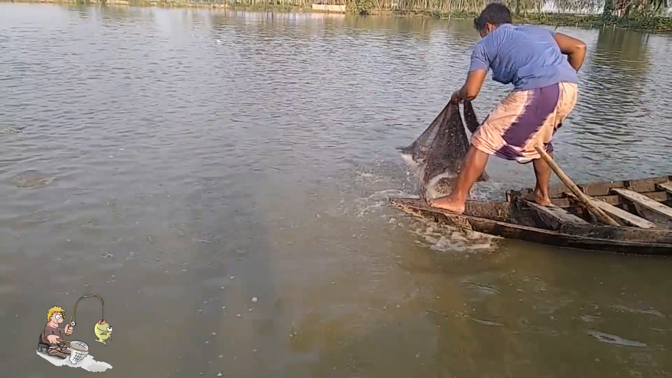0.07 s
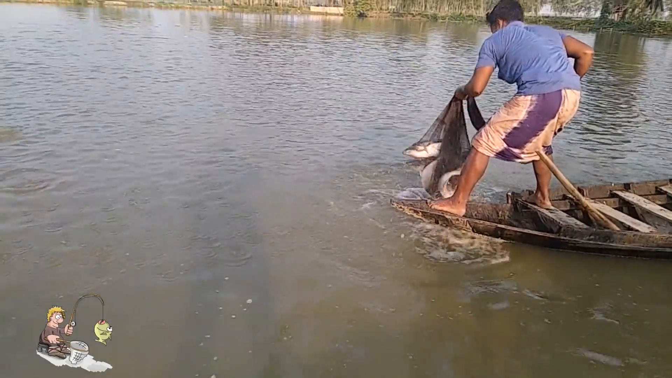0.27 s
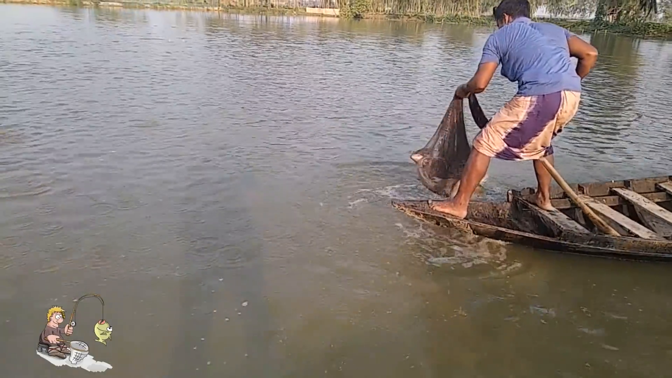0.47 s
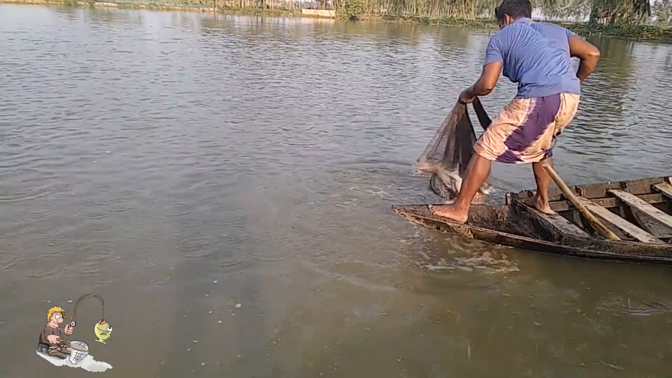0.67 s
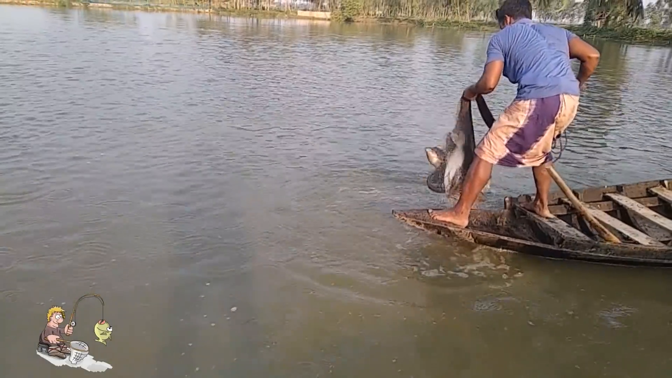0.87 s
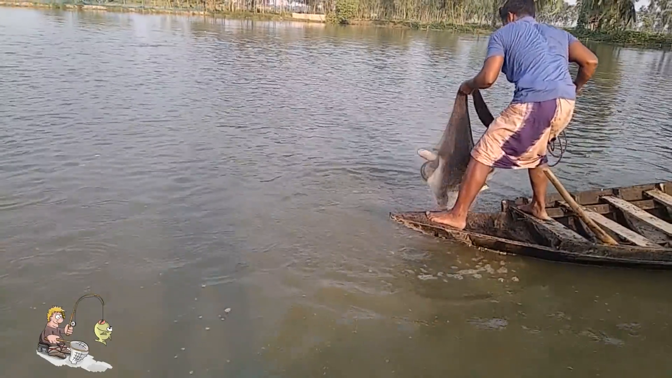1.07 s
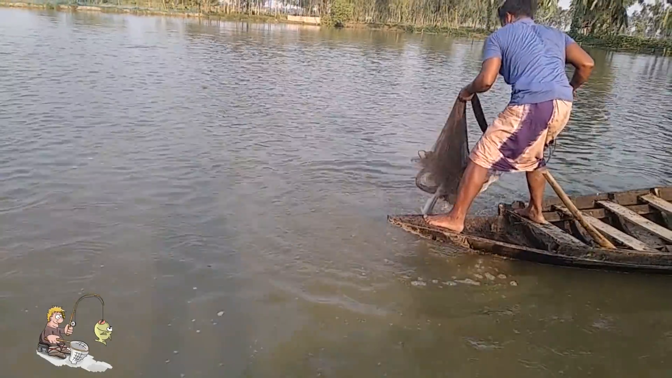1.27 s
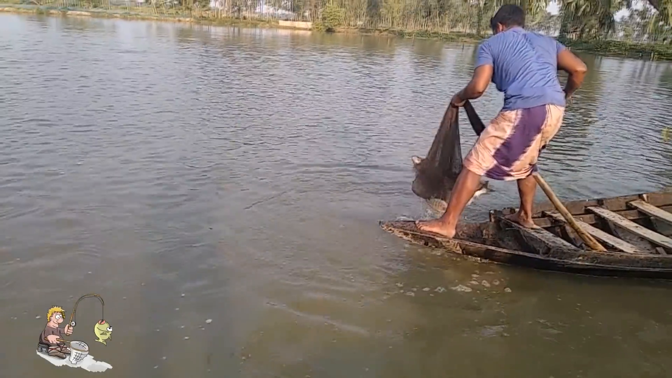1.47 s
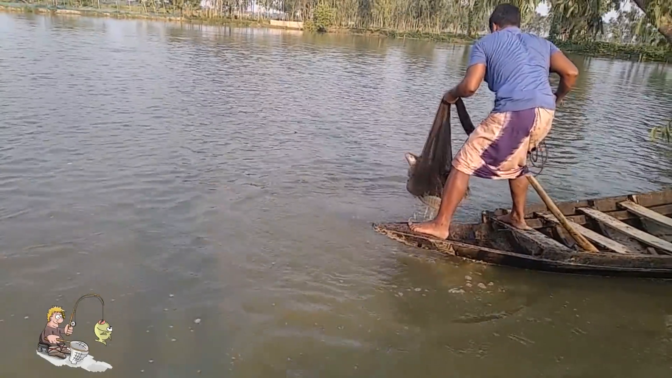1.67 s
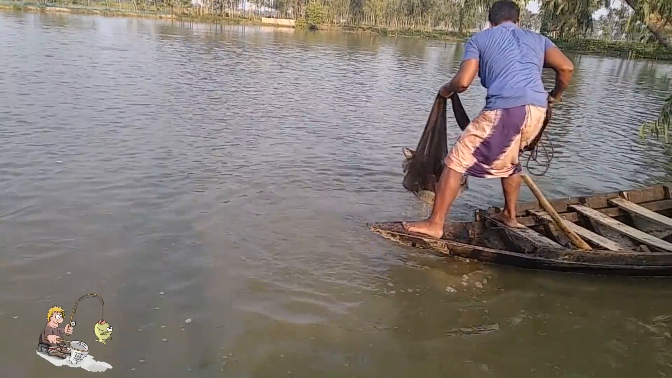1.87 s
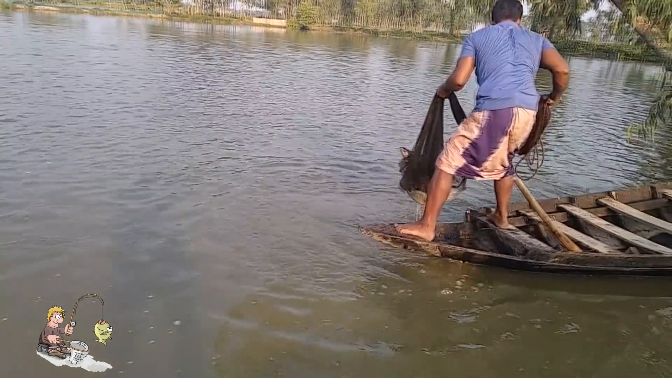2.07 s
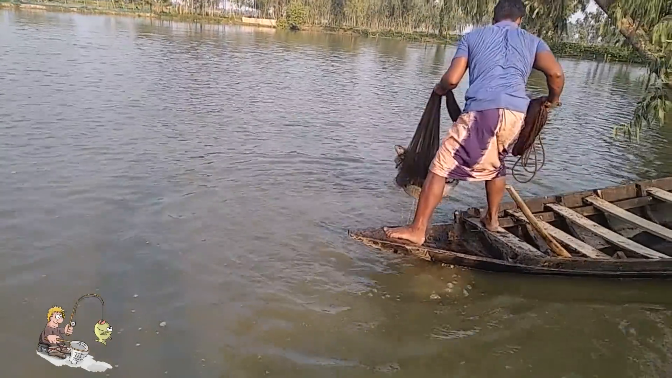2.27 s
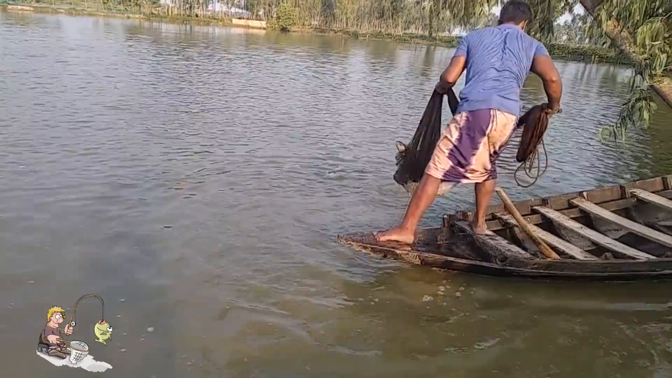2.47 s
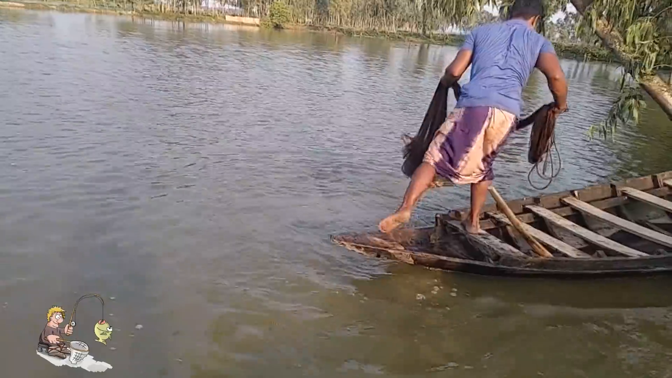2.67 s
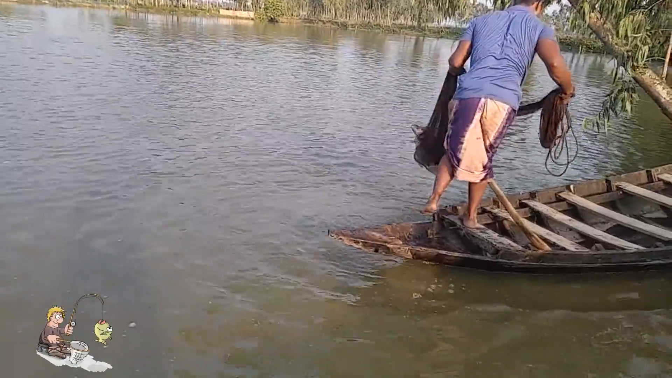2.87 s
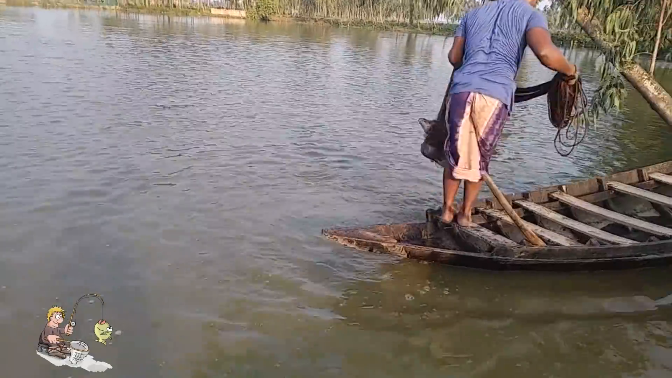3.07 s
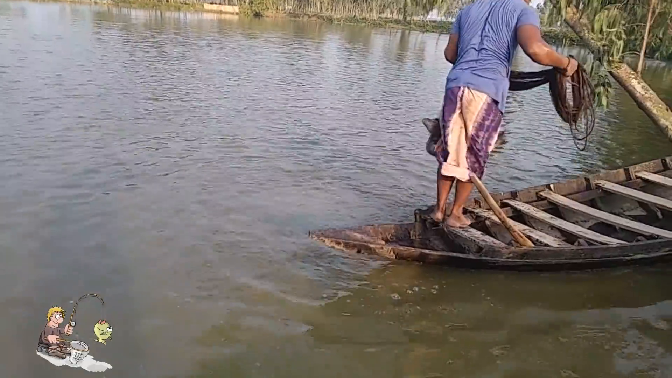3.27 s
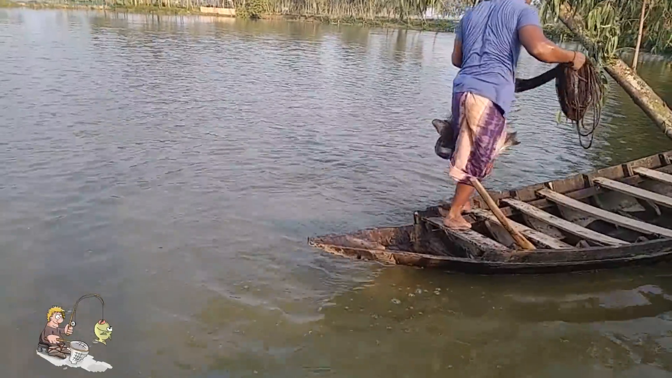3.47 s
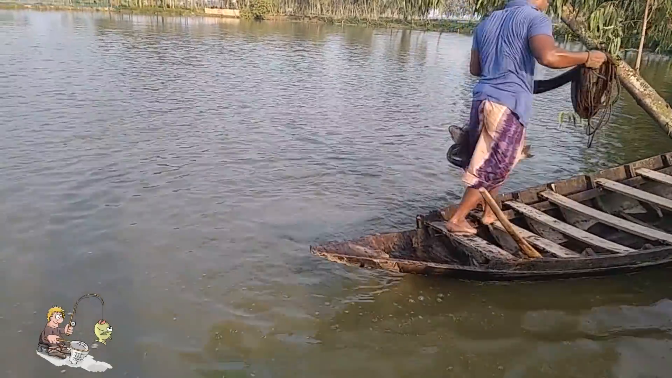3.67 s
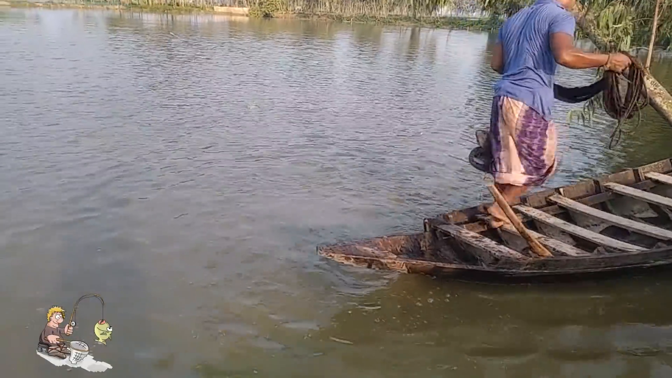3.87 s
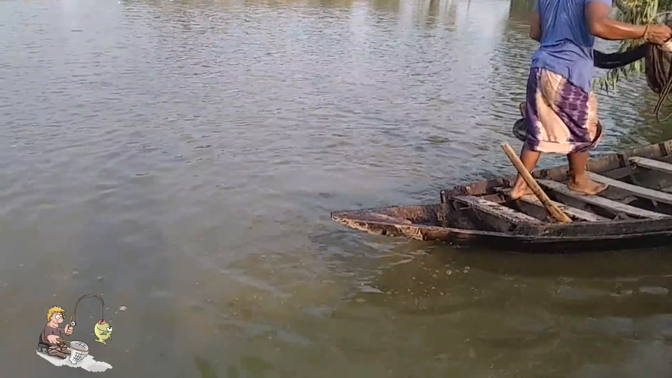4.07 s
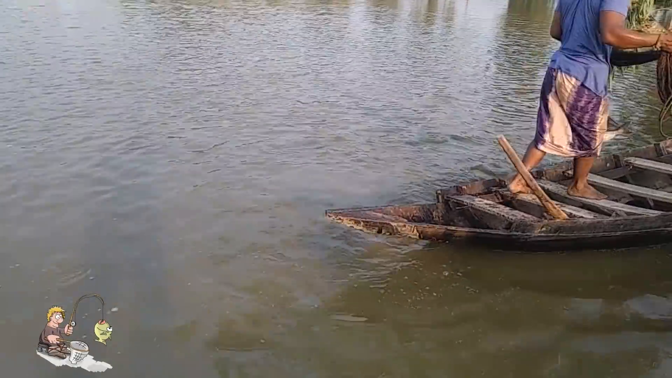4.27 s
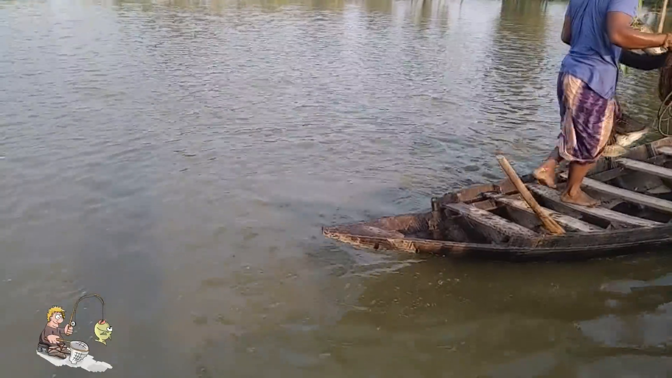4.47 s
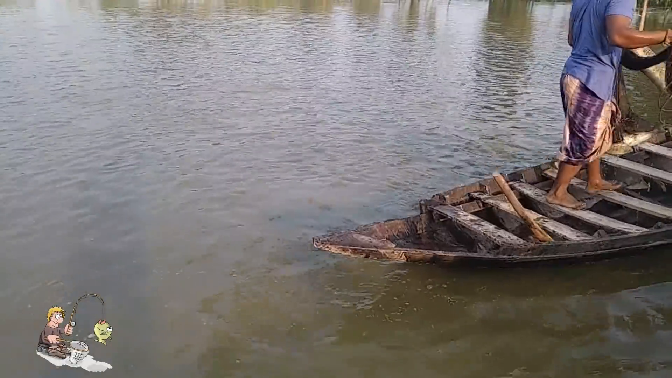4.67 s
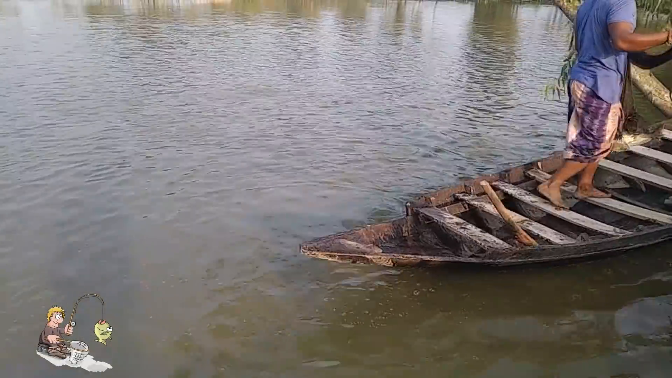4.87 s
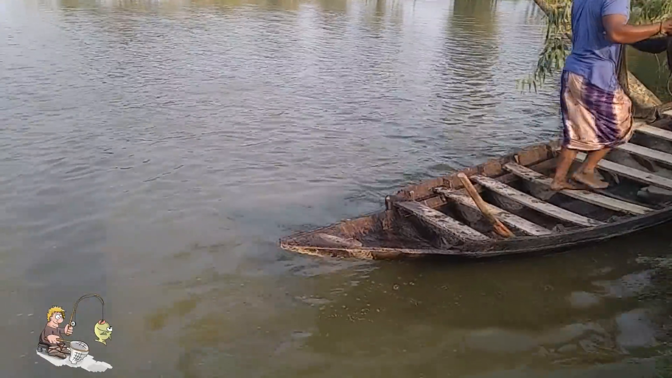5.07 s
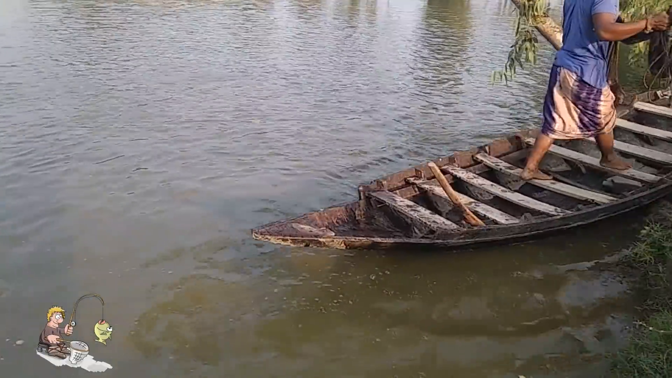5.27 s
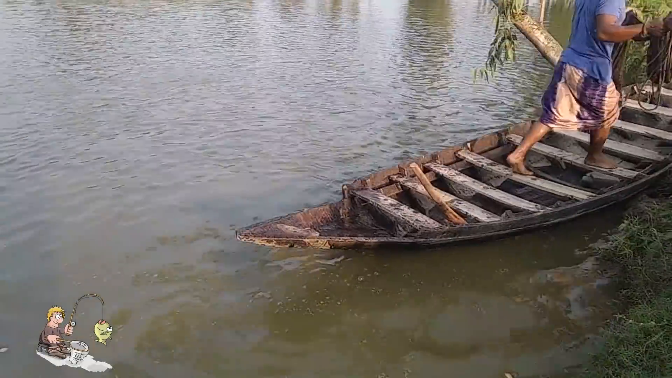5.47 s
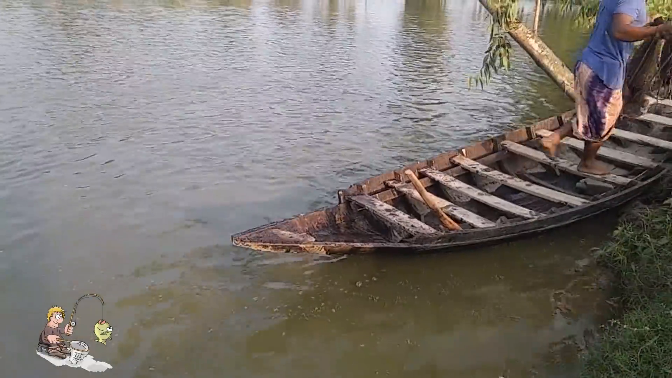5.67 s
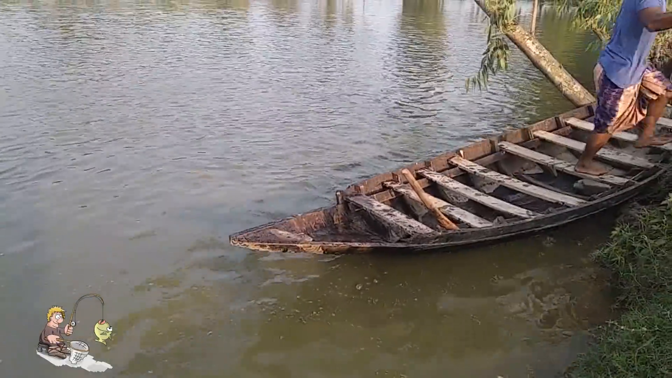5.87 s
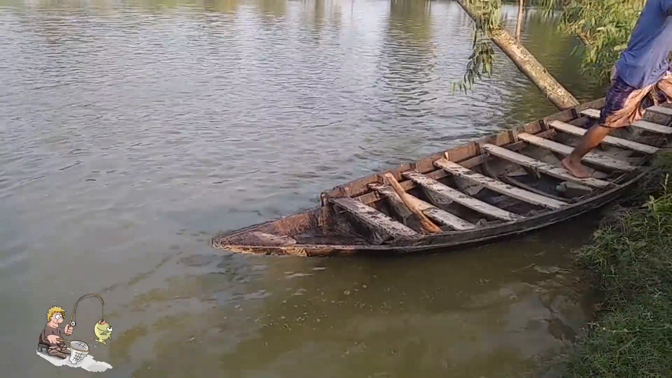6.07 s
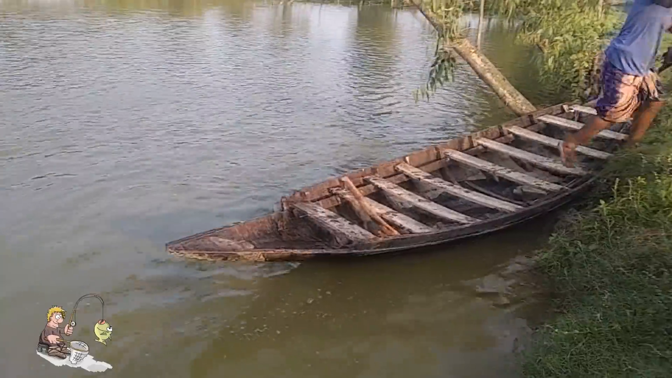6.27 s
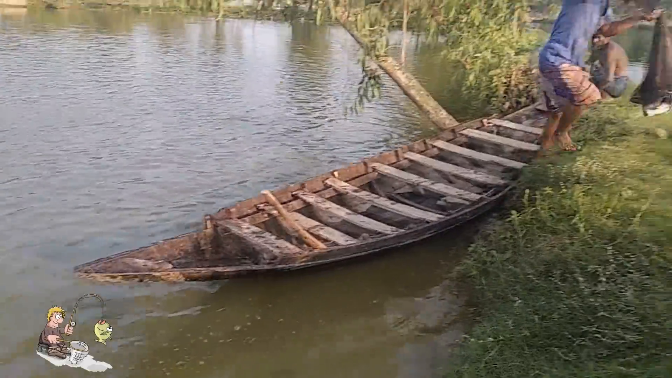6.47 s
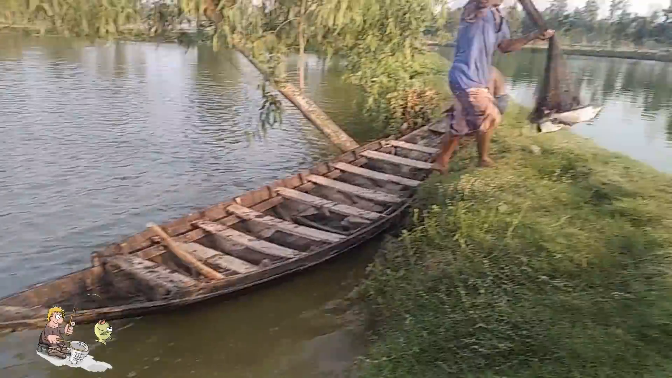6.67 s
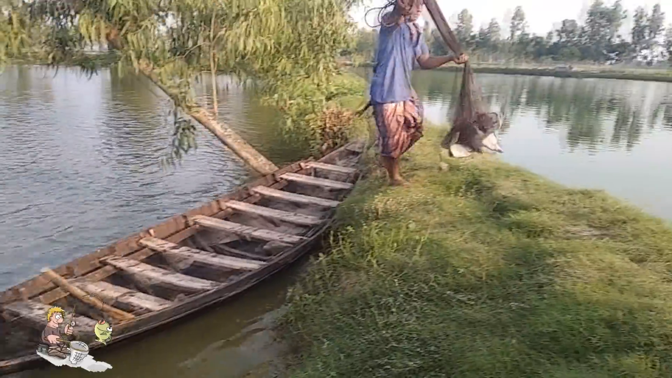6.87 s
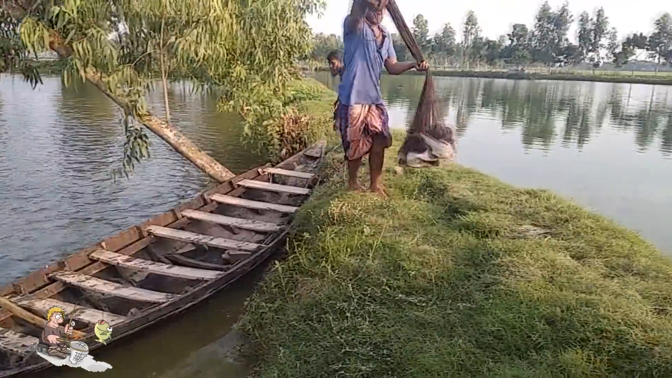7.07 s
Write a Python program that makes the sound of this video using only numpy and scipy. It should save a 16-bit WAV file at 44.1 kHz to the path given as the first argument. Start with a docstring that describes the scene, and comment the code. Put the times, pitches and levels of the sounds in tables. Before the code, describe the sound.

Close outdoor stereo on quiet water: a wet net is heaved up with pouring, splashing and plopping bubbles, strongest in the first second or so, with low knocks on the hull. Drips and soft mesh rustle follow, then dull barefoot thuds on planks, a sharp wooden crack, a brief wet squeak, deep plops, and finally a short groan and bright clicking of net weights.

```python
"""On a river, from a wooden boat: a cast net is hauled aboard, water pouring and splashing off its mesh (noise
and dense clicks) while pockets of air plop (rising tones) and the first footfalls knock (hull modes).
The drained net then rustles and drips as bare feet knock the planks and ripples meet the rocking hull.
A crack on the wood (shaped snaps) and a wet foot's squeak (a gliding tone with overtones) follow; last, the hull
groans and the net is swung to the grassy bank, its sinkers clicking. Two microphones hear it in open air."""
import sys
import numpy as np
from scipy import signal
from scipy.fft import rfft, irfft
from scipy.io import wavfile
from scipy.ndimage import uniform_filter1d

SR = 44100
rng = np.random.default_rng(int(sys.argv[2]) if len(sys.argv) > 2 else 0)


def inscribe(sig):
    """Save sig as 16-bit PCM at rate SR to the path in sys.argv[1].

    A 1-D sig is mono; a 2-D sig holds one channel per row.
    Samples are clipped to [-1, 1] before scaling.
    """
    pcm = np.round(np.clip(np.atleast_2d(sig).T, -1, 1) * 32767)
    wavfile.write(sys.argv[1], SR, pcm.astype(np.int16))


N = 314433
TIME = np.arange(N) / SR  # seconds

# Likeness of the two microphones. Each row: frequency in Hz, correlation from 0 to 1.
LIKENESS = [(300, 0.92), (700, 0.4), (2500, 0.3), (5000, 0)]
# Tilt between the microphones. Each row: frequency in Hz, left minus right in dB.
BALANCE = [(500, 0.5), (1200, 0.5), (2400, 7), (4400, -1.5), (13000, -0.5)]
EDGE_HZ = 16200  # upper band limit

# Spectra, before each sound is brought to its level. Each row: frequency in Hz, relative density in dB per Hz.
AIR_COLOUR = [(30, -23.5), (70, 2.5), (800, -10.5), (2400, -52), (4200, -29), (12500, -24), (14500, -42)]  # open air
ROCK_COLOUR = [(25, -46), (55, 9.5), (95, 8), (170, -13.5), (300, -15), (700, -44.5)]  # rumble of the hull
SQUIRT_COLOUR = [(300, -16), (800, 8), (1700, -2), (3300, 7), (4500, 2.5), (6300, 13.5), (9000, -32)]  # water squirting from under the foot
CHURN_COLOUR = [(100, -35), (250, -3), (500, 6), (1500, 3), (2600, 6.5), (4200, -6), (8000, -4.5),
                (15000, -45.5)]  # stirred water
CRACK_COLOUR = [(150, -13), (700, -1.5), (1400, -7), (2600, -7), (4200, -8), (6700, -3), (9500, -4),
                (16000, -13)]  # hard contact on wood
SPRAY_COLOUR = [(1200, -13), (3000, -7), (4400, -8.5), (6500, 1), (9500, 1), (13000, -0.5), (16000, -13)]  # water off the lifted net
MESH_COLOUR = [(2800, -18.5), (4400, -8), (6800, 5), (9000, 1.5), (12500, -9.5), (14500, -27)]  # drained mesh, gently moved
PULL_COLOUR = [(2000, -30.5), (4800, -34), (7000, -8), (10000, -3), (13000, -7), (16000, -17.5)]  # drained mesh, hard pulled; also the sinkers

# Shifts of weight that rock the hull. Each row: peak in seconds, level in dB.
HEAVES = [(1.0, -43.5), (3.143, -40.5), (3.55, -46.5), (3.863, -39), (4.03, -41), (4.289, -41),
          (4.69, -41.5), (4.87, -45), (5.11, -36.5), (5.54, -44), (5.93, -42.5), (6.37, -38.5),
          (6.762, -46)]
HEAVE_RISE_S, HEAVE_FALL_S, ADRIFT_DB = 0.085, 0.13, -68  # from and to a tenth; level between heaves

# Modes of the hull. Each row: centre frequency in Hz, relative level in dB, decay by 60 dB in seconds.
HULL = [(77, -16, 0.02), (98, -5, 0.049), (149, -14, 0.35), (216, -4, 0.1), (330, 6.5, 0.043),
        (423, -7, 0.17), (546, 2, 0.05), (845, -3.5, 0.047), (1370, 4, 0.0092)]
# Feet and the loaded net on the planks. Each row: start in seconds, peak in dB, hardness as a cutoff in Hz.
STEPS = [(0.979, -26, 500), (1.018, -25.5, 400), (1.063, -35, 300), (3.13, -35.5, 220), (3.167, -40, 400),
         (3.216, -28, 544), (3.236, -35.5, 420), (3.869, -46, 160), (4.04, -23.5, 345), (4.05, -20, 1090),
         (4.097, -35, 200), (4.3, -32, 234), (4.35, -30, 100), (5.053, -23, 296), (5.121, -50, 90),
         (6.298, -36.5, 214), (6.368, -36, 100)]

# Boat groaning against the bank. Each row: time in seconds, level in dB, pitch in Hz, overtone share in dB.
GROAN = [(6.39, -68, 347, 12), (6.425, -56.5, 307, 16), (6.475, -56.5, 285, 18), (6.525, -43, 365, -16)]
# Wet foot on wood. Each row: time in seconds, level in dB, pitch in Hz, overtone share in dB.
SQUEAK = [(5.533, -62, 340.5, 6), (5.545, -48.5, 342.7, 1), (5.565, -38.5, 379, -3),
          (5.577, -26, 389, -21.5), (5.596, -37, 412.5, -25), (5.62, -47, 425, -11)]

# Water stirred by net or hull. Each row: peak in seconds, level in dB before churn's gain, rise in seconds.
SLOSHES = [(0.02, -25.5, 0.061), (0.12, -31.5, 0.15), (0.38, -44, 0.03), (0.6, -46.5, 0.28),
           (0.89, -37, 0.046), (0.99, -35.5, 0.031), (1.11, -44.5, 0.42), (1.455, -43, 0.13),
           (1.755, -47.5, 0.04), (1.885, -52.5, 0.014), (2.15, -43, 0.08), (2.45, -41.5, 0.23),
           (3.0, -53.5, 0.4), (3.48, -41.5, 0.0052), (3.95, -48, 0.06), (4.39, -41, 0.01),
           (4.83, -44.5, 0.02), (5.07, -40.5, 0.011), (5.44, -42, 0.034), (5.58, -42, .04),
           (6.225, -44.5, 0.042), (6.53, -46, 0.21)]
SLOSH_FALL_S, SLOSH_FALL_SHARE = 0.076, 1  # fall to a tenth: a base plus a share of the rise
LAPPING_DB = -59  # before churn's gain: the water never rests against the hull
# Larger pockets held under net or hull. Each row: start and length in seconds, level in dB, mean pitch in Hz.
GURGLES = [(0.247, 0.2, -52.5, 606), (0.533, 0.12, -49, 368), (1.205, 0.1, -52, 509),
           (2.43, 0.097, -42, 554), (2.615, 0.044, -41.5, 821), (3.891, 0.123, -45.5, 367)]
# Air pockets closing. Each row: closing time in seconds, level in dB before the plops' gain, pitch in Hz.
PLOPS = [(0.002, -24, 543), (0.11, -20.5, 632), (0.303, -33.5, 1800), (0.889, -30.5, 890), (1.02, -28, 810),
         (1.023, -27.5, 1500), (1.063, -16.5, 970), (1.064, -21, 1766), (1.1, -30.5, 1260),
         (1.215, -27, 1830), (1.447, -24.5, 1620), (1.542, -30, 1450), (1.57, -33, 1500),
         (1.712, -34.5, 1830), (1.757, -43.5, 852), (1.882, -32.5, 1063), (1.96, -42, 1674),
         (2.084, -33, 1173), (2.183, -40.5, 1440), (2.328, -30.5, 980), (2.409, -30.5, 666),
         (2.412, -31.5, 1620), (2.439, -33.5, 540), (2.469, -34.5, 432), (2.509, -22.5, 987),
         (2.63, -30, 656), (2.661, -34.5, 712), (2.997, -38, 943), (3.005, -41.5, 1674), (3.685, -44, 680),
         (3.815, -40.5, 1925), (3.872, -43, 1100), (3.882, -39.5, 486), (3.931, -18.5, 1040),
         (3.965, -34, 635), (3.987, -39.5, 794), (4.265, -50.5, 1415), (4.354, -40, 2120),
         (4.555, -40.5, 1210), (4.652, -36.5, 1075), (5.429, -31.5, 1620), (5.44, -22, 604),
         (5.48, -38, 367), (5.698, -45, 1006), (5.983, -20, 341), (5.995, -15, 441), (6.008, -28, 598),
         (6.061, -38.5, 1260), (6.209, -29, 1960), (6.629, -36.5, 1326), (6.666, -37, 1070)]
# A pocket at RING_AT_DB has a decay of RING_CYCLES; louder ones decay sooner, softer ones ring on.
RING_CYCLES, RING_AT_DB, RING_DAMPING = 4.0, -31.5, 0.54
# Drops falling back on the water; the last three rows are the mid-pitched crackle of the net as it is swung.
# Each row: start in seconds, level in dB, centre in Hz.
SPATTERS = [(0.84, -35, 2530), (0.915, -40, 2200), (0.979, -40, 704), (1.085, -35, 1950),
            (1.145, -35.5, 2170), (1.44, -33.5, 1680), (2.237, -46.5, 2720), (2.407, -36, 1890),
            (2.503, -36, 2350), (2.544, -39.5, 2410), (6.861, -49.5, 2530), (6.946, -39.5, 2600),
            (7.01, -43, 2630)]
# Slaps of water and ticks of the net. Each row: start in seconds, level in dB before the slaps' gain, centre in Hz.
SLAPS = [(0.025, -13, 10000), (0.108, -14, 7150), (0.1072, -19.5, 990), (0.1423, -11.5, 2500),
         (0.233, -12, 10700), (0.5282, -23, 13300), (0.608, -20.5, 9100), (0.6802, -14.5, 11200),
         (0.7215, -25, 12100), (0.755, -16.5, 8800), (0.77, -13, 12000), (0.832, -15.5, 9800),
         (0.8927, -18.5, 2800), (1.0177, -17.5, 1460), (2.162, -38, 6060), (2.289, -39.5, 2360),
         (2.345, -32.5, 2780), (2.3597, -33, 6700), (2.446, -29.5, 6700), (2.603, -36.5, 5900),
         (3.047, -43, 4500), (4.218, -38, 2380), (4.3805, -34, 2350), (5.438, -30, 2750),
         (5.455, -27.5, 8200), (6.218, -20.5, 2570), (6.224, -14.5, 3200), (6.2758, -25.5, 4530),
         (6.2967, -27.5, 5430), (6.838, -30.5, 2320), (7.003, -17, 10400)]

# Crack with rebounds and echoes. Each row: time in seconds, level in dB relative to the crack's gain.
CRACK = [(5.052, 13), (5.057, -8), (5.073, -13), (5.0816, -8)]
# Sinkers clicking together. Each row: time in seconds, level in dB relative to the sinkers' gain.
SINKERS = [(0.6807, 7), (0.6862, 6.5), (0.7225, 8), (0.849, 1.5), (5.391, -7.5), (5.848, 0), (6.263, -7),
           (6.8275, 5), (6.875, 12.5), (6.882, 7), (6.964, 4), (6.969, 11), (6.997, 14.5)]

# Net heaves and catch thrashes, throwing spray. Each row: peak in seconds, level in dB, rise in seconds.
SPLASHES = [(0.03, -24, 0.84), (0.17, -25.5, 0.34), (0.62, -40.5, 0.074), (0.78, -28, 0.16),
            (0.85, -23.5, 0.038), (0.99, -23.5, 0.012), (1.1, -24.5, 0.03), (1.32, -37.5, 0.0087),
            (1.45, -40, 0.0099)]
SPLASH_FALL_S, SPLASH_FALL_SHARE = 0.094, 0.24  # fall to a tenth: a base plus a share of the rise
# Water running off the lifted net. Each row: time in seconds, level in dB.
RUNOFF = [(0.0, -41), (0.46, -52.5), (1.2, -42), (1.65, -60), (3.3, -89)]
# Drained mesh gathered, shifted, swung. Each row: start in seconds, level in dB, length in seconds.
RUSTLES = [(2.036, -47.5, 0.2), (2.359, -47.5, 0.057), (2.417, -50, 0.16), (2.592, -56, 0.078),
           (2.81, -52.5, 0.082), (2.94, -56, 0.16), (3.839, -52.5, 0.14), (4.412, -40.5, 0.016),
           (4.586, -50.5, 0.033), (4.861, -43, 0.06), (5.04, -32, 0.026), (5.365, -45.5, 0.084),
           (5.527, -32.5, 0.041), (5.814, -35, 0.077), (5.883, -55, 0.11), (6.083, -48.5, 0.052),
           (6.21, -44, 0.081), (6.34, -54, 0.35), (6.762, -36, 0.14), (6.865, -30, 0.16),
           (6.935, -23, 0.066), (7.099, -32, 0.023)]
CATCH_S, CATCH_SHARE, RUSTLE_FALL_S = 0.0038, 0.31, 0.098  # catch: base plus share of length; fall to a tenth


def amp(db):
    """Decibels to gain."""
    return 10 ** (np.asarray(db) / 20)


def unit(x):
    """Scales to rms 1."""
    return x / np.sqrt(np.mean(x ** 2) + 1e-20)


def read(points, hz):
    """Reads a spectrum table on a log-frequency axis."""
    f, value = np.transpose(points)
    return np.interp(np.log(hz + 1), np.log(f), value)


def level(curve):
    """A dB curve as a gain for every sample."""
    return amp(np.interp(TIME, *np.transpose(curve)))


def add(mix, s, sound):
    """Mixes a sound in at time s, trimming what falls outside."""
    start = round(s * SR)
    sound = sound[..., max(-start, 0):]
    part = mix[:, max(start, 0):][:, :sound.shape[-1]]
    part += sound[..., :part.shape[1]]


def colour(x, points):
    """Gives two unrelated signals a spectrum, and makes the microphones alike in the bass."""
    hz = np.fft.rfftfreq(x.shape[1], 1 / SR)
    a, b = rfft(x)
    angle = np.arccos(np.clip(read(LIKENESS, hz), -1, 1)) / 2
    pair = a * np.cos(angle) + np.array([b, -b]) * np.sin(angle)
    return unit(irfft(pair * amp(read(points, hz)), x.shape[1]))


def wobble(size):
    """Smooth random curve of rms 1, changing over the given number of samples."""
    once = uniform_filter1d(rng.standard_normal(N), size)
    return unit(uniform_filter1d(once, size))


def patchy(x, depth_db, size):
    """Random patches in pitch and time (size in bins, frames), as clusters of drops come and go."""
    z = signal.stft(x, nperseg=512, noverlap=384)[2]
    field = rng.standard_normal(z.shape[1:])
    for axis in (0, 1, 0, 1):
        field = uniform_filter1d(field, size[axis], axis)
    patched = z * amp(depth_db * unit(field))
    return signal.istft(patched, nperseg=512, noverlap=384)[1][:, :N]


def grains(per_s, spread_db):
    """Tiny clicks of uneven size, each reaching the two microphones with its own lag."""
    size = amp(spread_db * np.minimum(rng.exponential(1, N), 4)) * rng.choice([-1, 1], N)
    lag = rng.integers(-18, 19, N)  # samples
    at = np.flatnonzero(rng.random(N) < per_s / SR)
    left = np.bincount(at, size[at], N)
    right = np.bincount((at + lag[at]) % N, size[at], N)
    return unit(np.array([left, right]))


def swells(rows, fall_s, fall_share):
    """Each gesture swells from a tenth in its rise time and dies away; slow ones can also fade slowly."""
    power = np.zeros(N)
    for s, db, rise_s in rows:
        rising = (s - TIME) / rise_s
        falling = (TIME - s) / (fall_s + fall_share * rise_s)
        tenths = np.maximum(rising, falling)  # powers of ten below the peak
        near = tenths < 3
        power[near] += (amp(db) * 10 ** -tenths[near]) ** 2
    return np.sqrt(power)


def open_air(air_db=-59.5):
    """Steady coloured noise: the quiet open air."""
    return amp(air_db) * colour(rng.standard_normal((2, N)), AIR_COLOUR)


def surroundings(x, wet_db=-15, t60=0.21):
    """A short faint scatter off the boat and the bank: decaying noise that starts 4 ms late."""
    t = np.arange(SR // 3) / SR
    tail = rng.standard_normal((2, len(t))) * np.exp(-np.log(1000) * t / t60) * (t > .004)
    tail = colour(tail, [(3000, 0), (12000, -8)]) / np.sqrt(len(t))
    return x + amp(wet_db) * signal.oaconvolve(x, tail, axes=1)[:, :N]


def rocking():
    """The hull rumbles around every shift of weight, and faintly while it drifts."""
    heaves = [(s, db, HEAVE_RISE_S) for s, db in HEAVES]
    heaving = swells(heaves, HEAVE_FALL_S, 0)
    return np.hypot(heaving, amp(ADRIFT_DB)) * colour(rng.standard_normal((2, N)), ROCK_COLOUR)


def churn(gain_db=-4, wash_db=-5, per_s=16, busy_db=-48, cycles=3.94, rise=0.064, count=24):
    """Small rising bubbles in a wash of moving water: a few when calm, a crowd when stirred."""
    stir = np.hypot(swells(SLOSHES, SLOSH_FALL_S, SLOSH_FALL_SHARE), amp(LAPPING_DB))
    crowd = np.clip(stir / amp(busy_db), .5, 20)  # stirred water traps more air
    bubbles = np.zeros((2, N))
    for hz in np.geomspace(300, 3500, count):
        age = np.arange(int(4 * cycles / hz * SR)) * hz / SR / cycles
        turns = cycles * (age + rise * age ** 2 / 2)
        bubble = age * np.exp(-2 * age) * np.sin(2 * np.pi * turns)
        births = grains(per_s * crowd, spread_db=4.5) / np.sqrt(crowd)
        bubbles += signal.oaconvolve(births, unit(bubble)[None] * np.sqrt(hz), axes=1)[:, :N]
    wash = patchy(rng.standard_normal((2, N)), depth_db=4.5, size=(5, 5))
    bubbly = crowd / (crowd + 2)  # calm water is mostly a soft wash
    water = bubbly * colour(bubbles, CHURN_COLOUR) + amp(wash_db) * colour(wash, CHURN_COLOUR)
    return amp(gain_db) * stir * unit(water)


def gurgles(waver=0.069, flutter_db=4.5, rise=0.092):
    """A held pocket of air rings with an unsteady pitch and strength, rising a little."""
    out = np.zeros((2, N))
    drift, flutter = waver * wobble(size=300), flutter_db * wobble(size=400)
    for s, length, db, hz in GURGLES:
        now = (TIME >= s) & (TIME < s + length)
        age = (TIME[now] - s) / length
        turns = np.cumsum(hz * (1 + drift[now] + rise * (age - .5))) / SR
        swell = np.sqrt(2 * np.sin(np.pi * age))
        add(out, s, amp(db + flutter[now]) * swell * np.sin(2 * np.pi * turns))
    return out


def plops(gain_db=-1, froth_db=-4.5, froth_width=0.4, slosh_db=-12, slosh_s=0.014,
          rise=0.1227, bend=0.4, lag_s=0.00026):
    """Each air pocket swells and rings, rising in pitch; a slower slosh of froth surrounds it."""
    out, t = np.zeros((2, N)), np.arange(-2000, 3000) / SR
    for s, db, hz in PLOPS:
        decay = RING_CYCLES / hz * amp(RING_AT_DB - db) ** RING_DAMPING
        swell = 1 / (np.exp(-2 * t / decay) + np.exp(t / decay))
        swell /= swell.max()
        slosh = amp(slosh_db) * np.exp(-np.maximum(t, -2 * t) / slosh_s)
        octaves = np.clip(rise * t / decay, -bend, bend)
        turns = np.cumsum(hz * 2 ** octaves) / SR
        turns = turns - turns[swell.argmax()]  # the ring is tied to the moment the pocket closes
        turns = turns + hz * lag_s * rng.standard_normal() * np.array([[.5], [-.5]])  # direction of arrival
        pole = np.exp(-np.pi * froth_width * hz / SR)
        lowpass = [[1, 0, 0, 1, -2 * pole, pole ** 2]]
        froth = unit(signal.sosfilt(lowpass, rng.standard_normal(len(t))))
        ring = swell * np.sin(2 * np.pi * turns)
        frothing = (amp(froth_db) * swell + slosh) * froth * np.cos(2 * np.pi * turns)
        add(out, s + t[0], amp(db + gain_db) * (ring + frothing))
    return out


def spatter(peak_s=0.0091, skirt_db=-11, far_db=-30):
    """A quick shower of separate clicks, falling drops or the crackling net, dulled around a centre pitch."""
    out, age = np.zeros((2, N)), np.arange(4096) / SR / peak_s
    drops = grains(per_s=1600, spread_db=4.0)
    for s, db, hz in SPATTERS:
        shower = drops[:, round(s * SR):][:, :len(age)]
        shower = colour(shower, [(hz / 10, far_db), (hz / 2, skirt_db / 2), (hz, 0),
                                 (hz * 2, skirt_db * 2), (hz * 10, 2 * far_db)])
        add(out, s, amp(db) * age * np.exp(1 - age) * shower)
    return out


def slaps(gain_db=-6, skirt_db=-11, low_db=-24, high_db=-26, peak_s=0.0022, spiky=0.5, pan_db=-1.5):
    """Tight clusters of tiny impacts, each cluster with its own centre pitch and side."""
    out, age = np.zeros((2, N)), np.arange(1024) / SR / peak_s
    shape = age * np.exp(1 - age)
    for s, db, hz in SLAPS:
        spikes = np.exp(spiky * np.minimum(rng.standard_normal(len(age)), 2))
        impacts = rng.standard_normal((2, len(age))) * spikes
        burst = colour(impacts, [(hz / 8, low_db), (hz / 2, skirt_db), (hz, 0),
                                 (hz * 2, skirt_db), (hz * 5, high_db)])
        side = pan_db * rng.standard_normal() * np.array([[1], [-1]])
        add(out, s, amp(db + gain_db + side) * unit(burst * shape) * np.sqrt(np.mean(shape ** 2)))
    return out


def steps(gain_db=0, scuff=0.66):
    """Feet and net push the hull into ringing; a harder blow reaches its higher modes."""
    out, t = np.zeros((2, N)), np.arange(SR // 4) / SR
    hz, db, t60 = np.transpose(HULL)[:, :, None]
    for s, peak_db, hard_hz in STEPS:
        detune = 1 + .05 * rng.uniform(-1, 1, hz.shape)
        sign = rng.choice([-1, 1], hz.shape)
        modes = amp(db - 60 * t / t60) * np.sin(2 * np.pi * hz * detune * t) * sign
        thud = modes.sum(0) + scuff * rng.standard_normal(len(t)) * np.exp(-t / 0.022)
        thud = signal.sosfilt(signal.butter(2, hard_hz, fs=SR, output="sos"), thud)
        add(out, s, amp(peak_db + gain_db) * thud / abs(thud).max())
    return out


def rub(rows, jitter, falloff, count, overtones_db, squirt_db):
    """Surfaces stick and slip: an unsteady pitch, changing overtones, a spurt of water at each slip."""
    s, *columns = np.transpose(rows)
    out, t = np.zeros((2, N)), np.arange(s[0], s[-1], 1 / SR)
    db, hz, over_db = (np.interp(t, s, c) for c in columns)
    unsteady = unit(uniform_filter1d(rng.standard_normal(len(t)), size=100))
    turns = np.cumsum(hz * (1 + jitter * unsteady)) / SR
    overtones = sum(np.sin(2 * np.pi * k * turns) * (2 / k) ** falloff for k in range(2, count))
    squirt = colour(rng.standard_normal((2, len(t))) * np.exp(-2 * (turns % 1)), SQUIRT_COLOUR)
    rasp = amp(overtones_db) * overtones + amp(squirt_db) * squirt
    add(out, s[0], amp(db) * np.sqrt(2) * (np.sin(2 * np.pi * turns) + amp(over_db) * rasp))
    return out


def groan():
    """The boat rubs against the bank: few overtones and little water."""
    return rub(GROAN, jitter=0.074, falloff=1.7, count=4, overtones_db=-5.5, squirt_db=-18.5)


def squeak():
    """A wet foot rubs on wood: many overtones and strong spurts."""
    return rub(SQUEAK, jitter=0.032, falloff=0.74, count=9, overtones_db=0.0, squirt_db=10.5)


def snaps(rows, points, gain_db, decay_s):
    """Hard contacts: brief noise bursts, evened in spectrum, with the colour of what is struck."""
    out, t = np.zeros((2, N)), np.arange(1024) / SR
    for s, db in rows:
        burst = rng.standard_normal((2, len(t))) * np.exp(-t / decay_s)
        contact = rfft(np.roll(burst, len(t) // 2, 1))  # onset at mid-window
        even = irfft(contact / (abs(contact) + 0.8 * abs(contact).mean()))  # excites pitches more alike
        add(out, s - t[-1] / 2, amp(gain_db + db) * colour(even, points))
    return out


def crack():
    """Something on the net strikes the wood, with rebounds and echoes."""
    return snaps(CRACK, CRACK_COLOUR, gain_db=-27.5, decay_s=0.00065)


def sinkers():
    """The net's sinkers click together: bright snaps."""
    return snaps(SINKERS, PULL_COLOUR, gain_db=-38, decay_s=0.0018)


def pulls():
    """Each pull on the mesh catches, holds while it slides, and dies away."""
    power = np.zeros(N)
    for s, db, length in RUSTLES:
        catch = np.clip((TIME - s) / (CATCH_S + CATCH_SHARE * length), 0, 1)
        release = 10 ** -np.clip((TIME - s - length) / RUSTLE_FALL_S, 0, 10)
        power += (amp(db) * catch * release) ** 2
    return np.sqrt(power)


def fizz(points, hiss_db=-3, clump_db=0.9):
    """Droplets over a fine hiss, in uneven clumps."""
    drops = grains(per_s=2800, spread_db=3.0) + amp(hiss_db) * rng.standard_normal((2, N))
    clumps = amp(clump_db * wobble(size=160))  # drops leave the mesh in bunches
    return colour(patchy(drops, depth_db=4.0, size=(7, 4)) * clumps, points)


def net(mesh_db=0, drained_s=1.75, pull_db=-32, brighten=1.9):
    """Spray off the lifted net; once drained, the mesh rustles, brighter the harder it is pulled."""
    spray = np.hypot(swells(SPLASHES, SPLASH_FALL_S, SPLASH_FALL_SHARE), level(RUNOFF))
    loudness = np.hypot(spray, pulls())
    bright = (loudness / amp(pull_db)) ** brighten  # both colours are equal at pull_db
    mesh = (fizz(MESH_COLOUR) + bright * fizz(PULL_COLOUR)) / np.sqrt(1 + bright ** 2)
    return loudness * np.where(TIME < drained_s, fizz(SPRAY_COLOUR), amp(mesh_db) * mesh)


def scene():
    """Water, net and boat over the quiet open air."""
    background = open_air() + rocking()
    water = churn() + gurgles() + spatter() + slaps()
    scattered = plops() + steps() + groan() + squeak() + crack() + sinkers()
    return background + water + surroundings(scattered) + net()


def record(dry, low_cut_hz=32):
    """Microphone balance and low cut, full-scale limit, then the upper band limit."""
    hz = np.fft.rfftfreq(N, 1 / SR)
    side_db = read(BALANCE, hz) / 2
    low_cut = hz ** 2 / np.hypot(hz ** 2, low_cut_hz ** 2)
    heard = irfft(rfft(dry) * low_cut * amp([side_db, -side_db]), N)
    band = signal.firwin(511, EDGE_HZ, window=("kaiser", 9), fs=SR)
    return signal.oaconvolve(np.clip(heard, -1, 1), band[None], "same")


dry = scene()
out = record(dry)
inscribe(out)
```